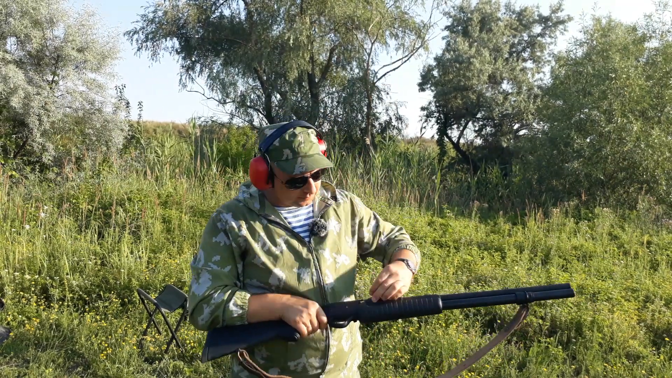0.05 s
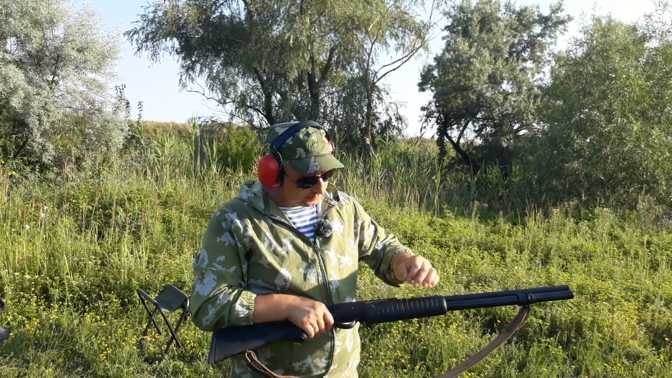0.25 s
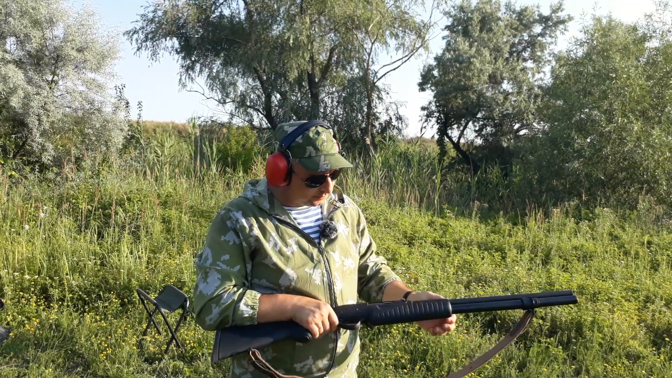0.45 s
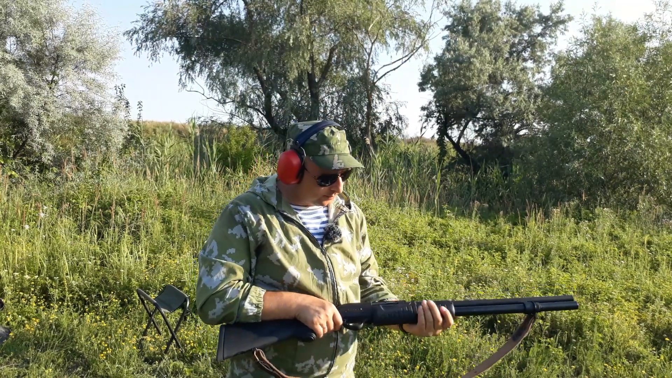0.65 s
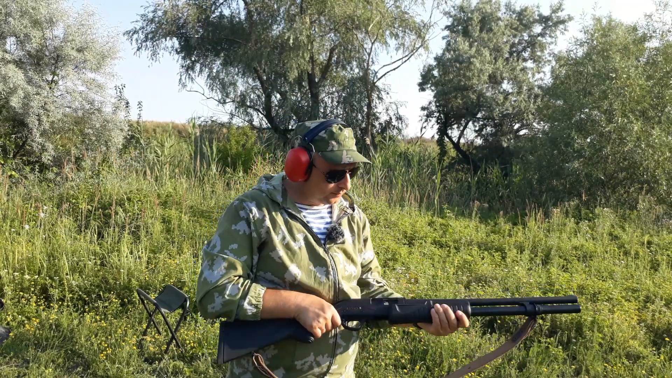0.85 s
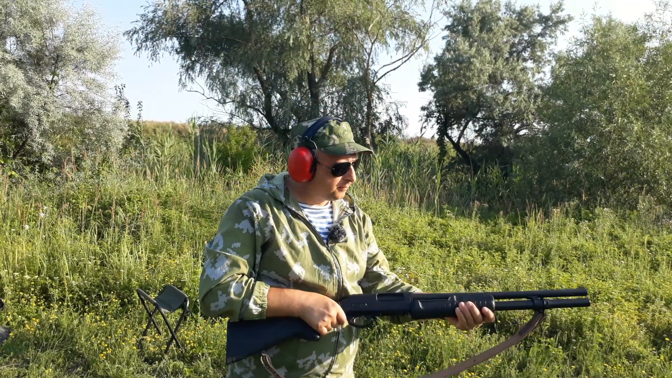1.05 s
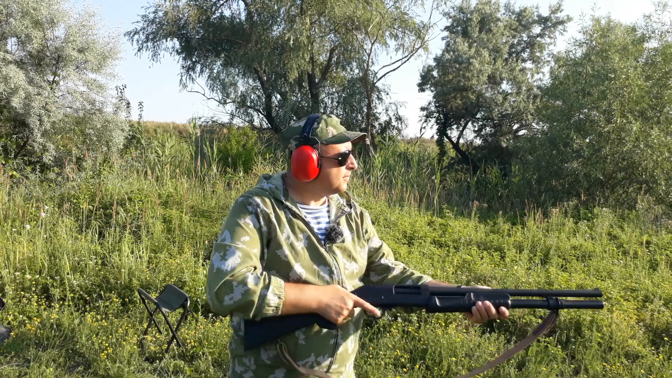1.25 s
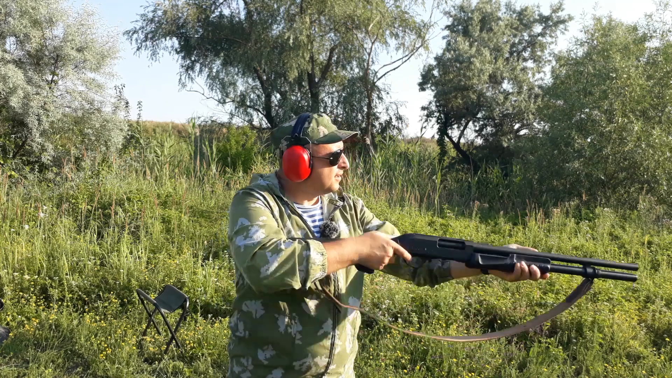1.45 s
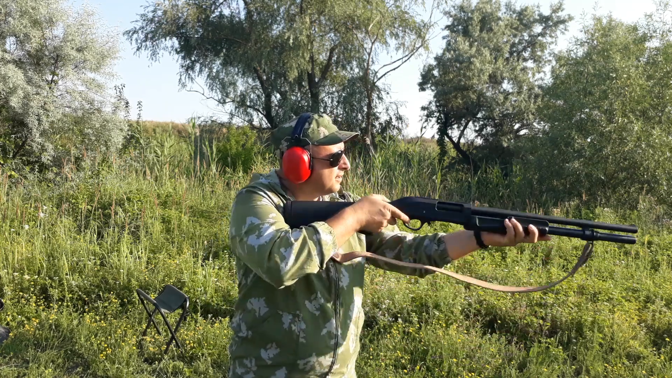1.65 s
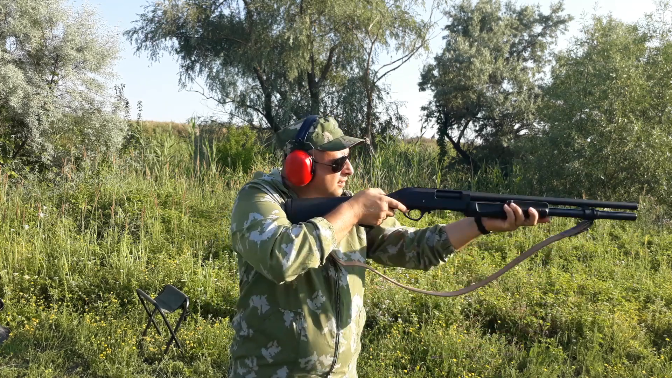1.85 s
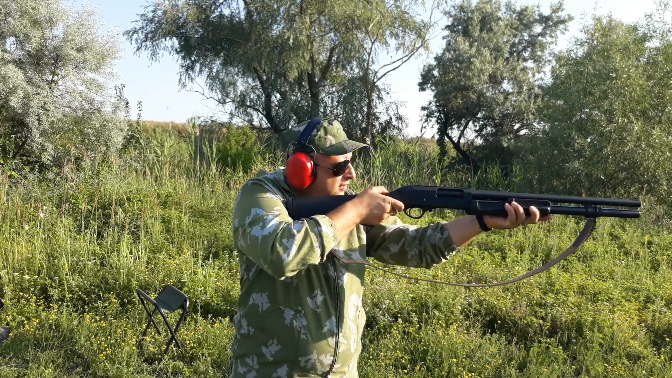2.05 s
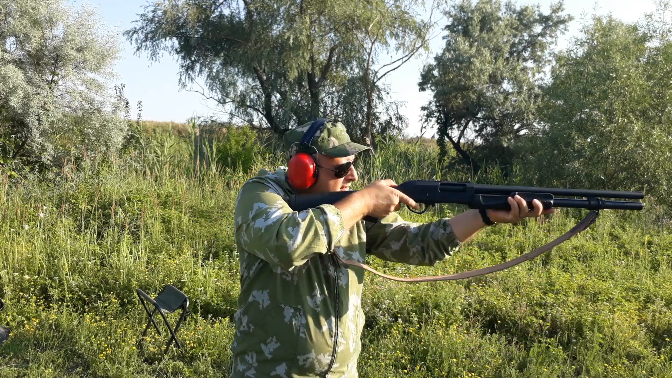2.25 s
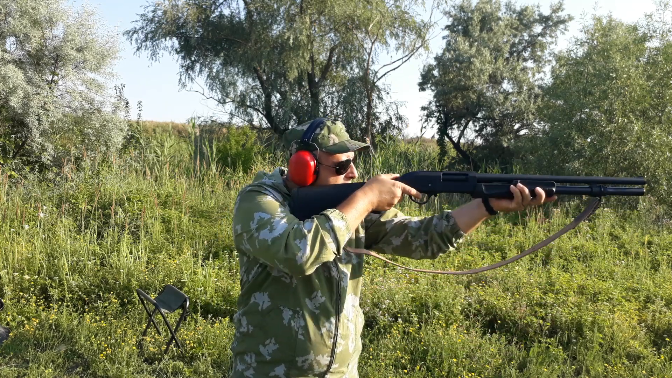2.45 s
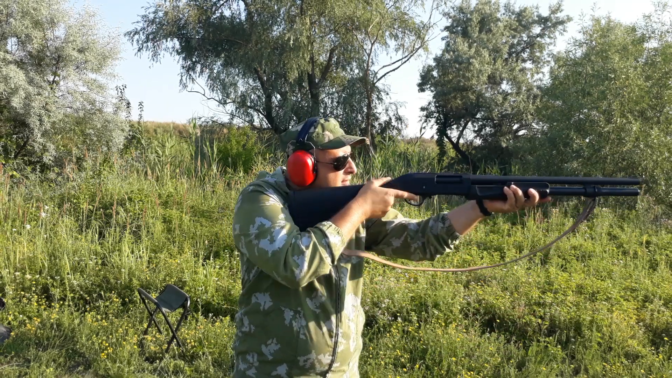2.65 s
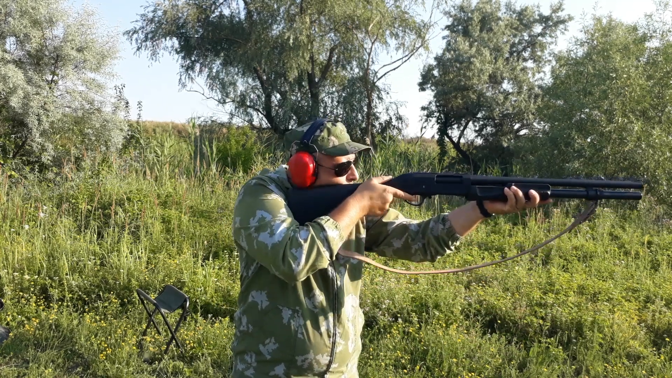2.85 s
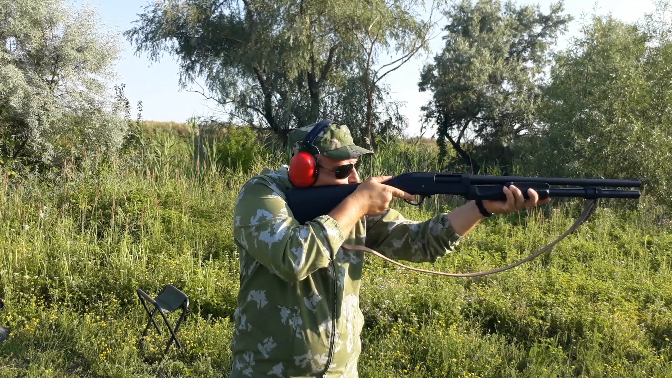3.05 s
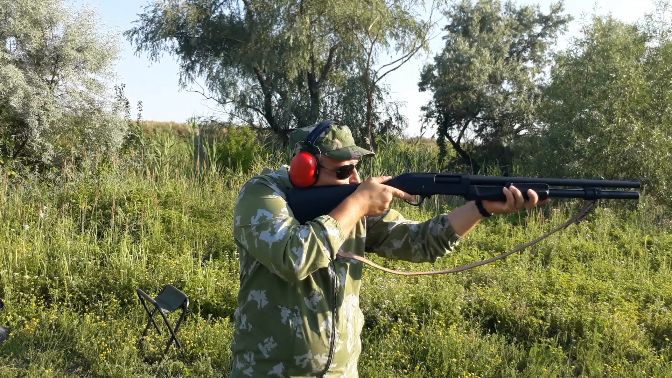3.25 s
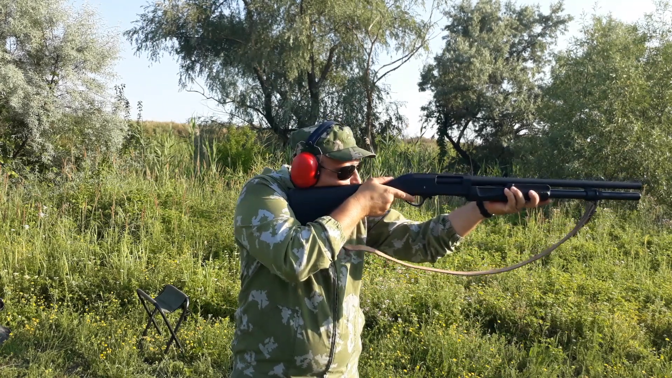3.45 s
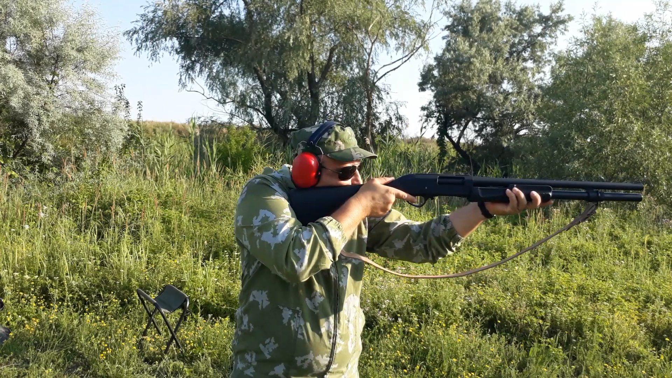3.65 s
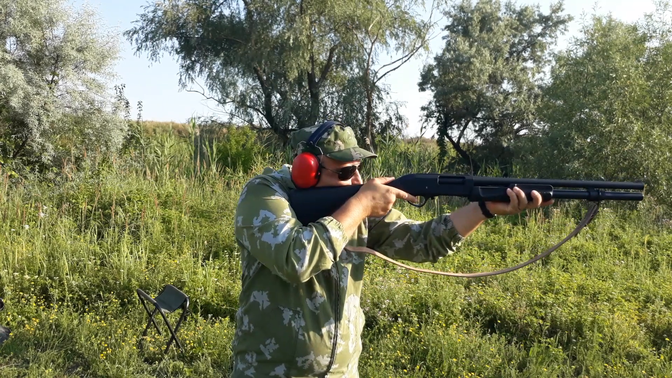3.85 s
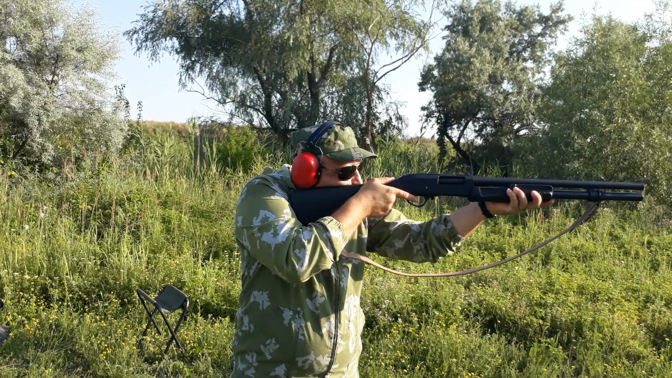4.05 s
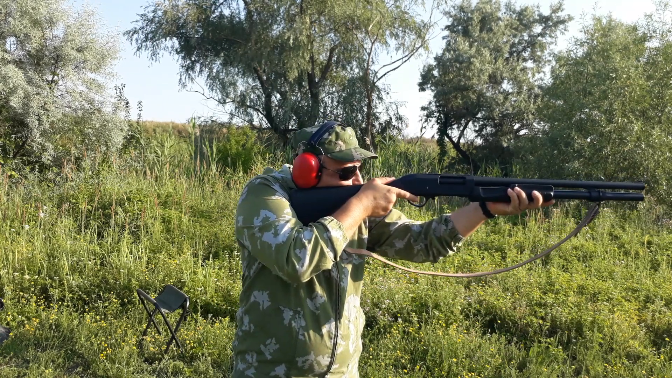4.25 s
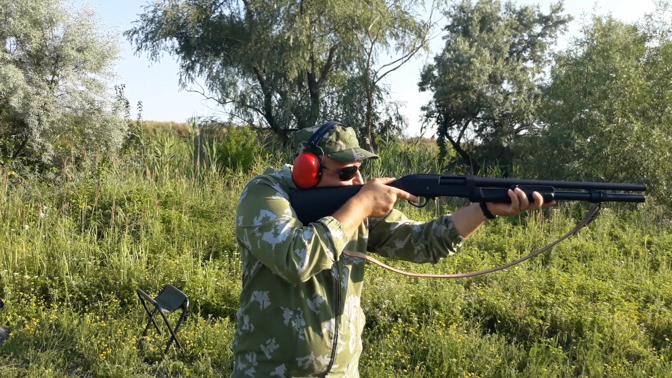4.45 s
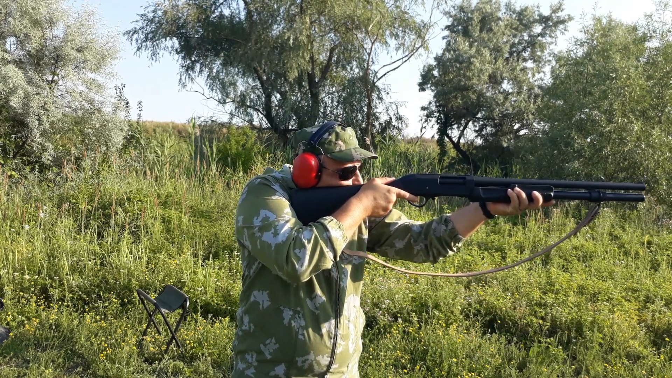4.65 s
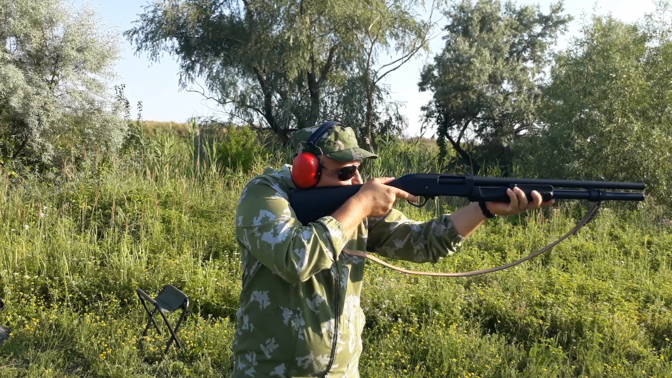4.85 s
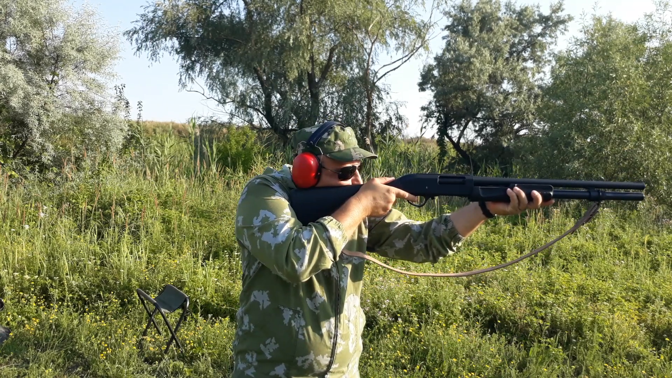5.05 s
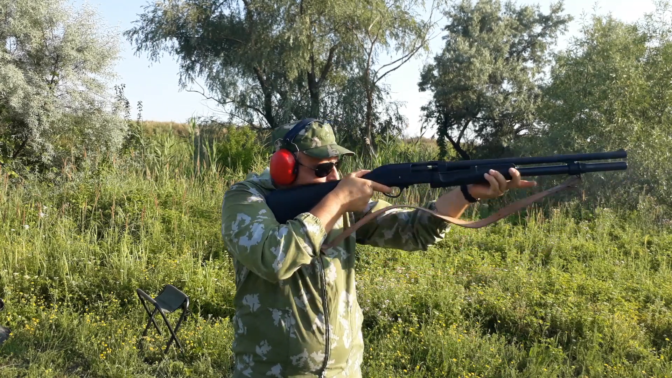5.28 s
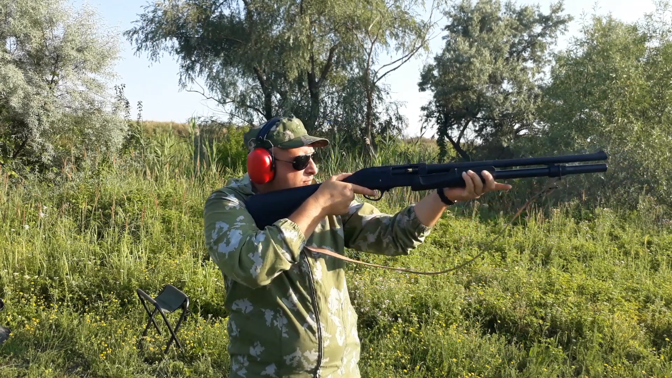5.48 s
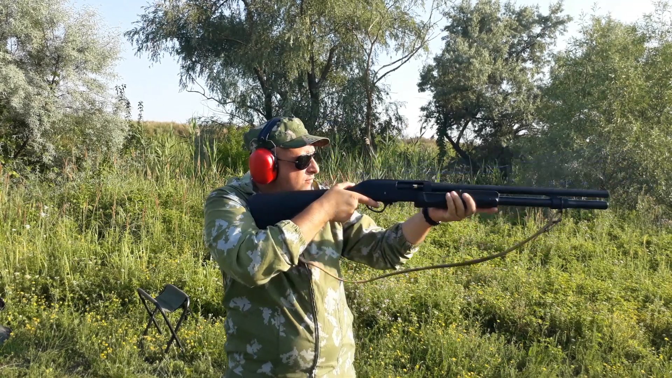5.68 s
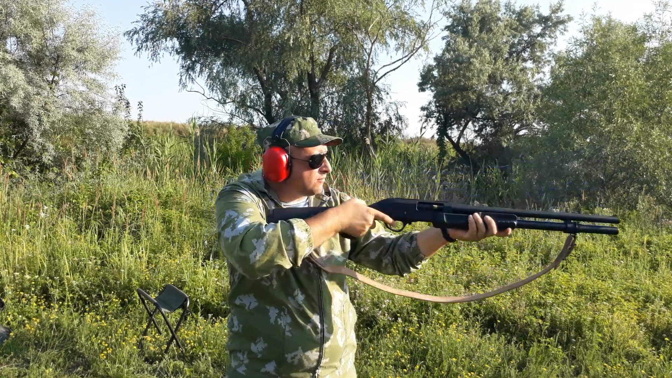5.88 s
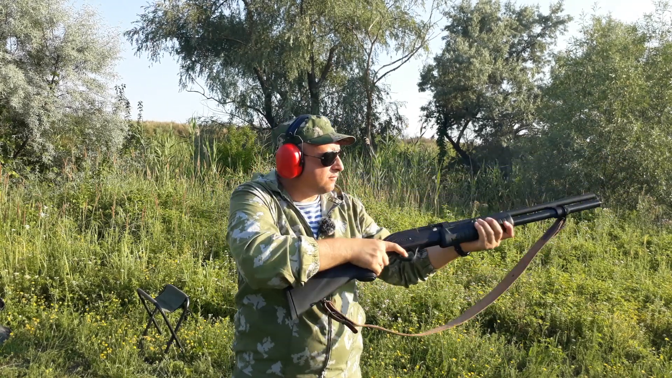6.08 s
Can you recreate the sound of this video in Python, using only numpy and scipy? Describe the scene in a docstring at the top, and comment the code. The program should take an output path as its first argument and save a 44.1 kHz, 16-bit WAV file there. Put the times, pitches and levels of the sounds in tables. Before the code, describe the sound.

A pump-action shotgun is loaded and racked shut, clothing rustles and bumps the microphone, then one loud shot echoes across a field.

```python
"""A meadow, heard through a small microphone clipped to the jacket of someone with a pump-action shotgun.
A shell is thumbed in and the slide is racked shut: steel scrapes and clicks, and a spring twangs.
The jacket rustles, and the stock (the gun's shoulder end) bumps the microphone on its way up.
One shot overloads the microphone's input, rolls over the field and comes back from the trees.
Faint air noise and an electric hum lie under it all."""
import sys
import numpy as np
from scipy import signal
from scipy.io import wavfile

SR = 44100
rng = np.random.default_rng(int(sys.argv[2]) if len(sys.argv) > 2 else 0)


def pcm_store(signal):
    """Save signal as 16-bit PCM."""
    levels = np.round(np.clip(np.atleast_2d(signal), -1, 1) * 32767)
    wavfile.write(sys.argv[1], SR, levels.astype(np.int16).T)


N = 269892
TIME = np.arange(N) / SR
SHOT_S = 5.363

# tone of things rubbing, cloth or steel: f/Hz, level/dB
FRICTION_SPECTRUM = [(50, -27), (100, -8.5), (250, -5), (600, -4), (1200, -3), (2000, 0.5), (3000, -11),
                     (5000, -17), (6000, -23), (10000, -28)]
# tone of a sharp snap: f/Hz, level/dB
SNAP_SPECTRUM = [(2400, -31.5), (3300, 3.5), (4000, -0.5), (5000, 3), (5700, -6), (7000, -7.5),
                 (8700, -13.5), (9600, -9.5), (11000, -28.5)]


def from_db(db):
    """Turn decibels into a number to multiply a sound by."""
    return 10 ** (np.asarray(db) / 20)


def rms_one(x):
    """Scale a sound so that its average strength (rms) is 1."""
    return x / np.sqrt(np.mean(x ** 2) + 1e-20)


def add(out, s, sound):
    """Mix a sound in, starting at s seconds."""
    start = round(s * SR)
    out[start:start + len(sound)] += sound[:N - start]


def coloured(x, points):
    """Shape the tone of a noise with rows of f/Hz, level/dB; the result has rms 1."""
    hz, db = np.transpose(points)
    bins = np.maximum(np.fft.rfftfreq(len(x), 1 / SR), 1)
    gain = from_db(np.interp(np.log(bins), np.log(hz), db))
    return rms_one(np.fft.irfft(np.fft.rfft(x) * gain, len(x)))


def keep_side(x, hz, kind, order=2):
    """Keep the "low" or the "high" side of a sound, split at hz."""
    return signal.sosfilt(signal.butter(order, hz, kind, fs=SR, output="sos"), x)


def resonance(x, hz, width_hz):
    """Make a sound ring at one pitch; a narrower width rings longer."""
    r = np.exp(-np.pi * width_hz / SR)
    feedback = [1, -2 * r * np.cos(2 * np.pi * hz / SR), r * r]
    return signal.lfilter(np.array([1, 0, -1]) * (1 - r * r) / 2, feedback, x + 1e-18)


def dying(t, t60):
    """A fade that starts at t = 0 and drops 60 dB every t60 seconds; silence before."""
    return np.exp(-np.log(1000) * np.maximum(t, 0) / t60) * (t >= 0)


def grains(spread_db):
    """Rubbing noise: tiny slips of uneven size, a new size every millisecond."""
    marks = np.arange(0, N, SR // 1000)
    sizes = np.clip(rng.standard_normal(len(marks)), -2, 2)
    return rng.standard_normal(N) * from_db(spread_db * np.interp(np.arange(N), marks, sizes))


def snagging(per_s, db, t60):
    """A loudness curve that jumps at each random snag and falls back."""
    snags = (rng.random(N) < per_s / SR) * rng.uniform(.5, 1, N)
    jumps = signal.lfilter([1], [1, -1000 ** (-1 / (t60 * SR))], snags + 1e-18)
    return rms_one(1 + from_db(db) * jumps)


def gains(rows, fade_s=0.043):
    """One loudness curve for each dB column of timed rows, fading out beyond their ends."""
    s, *columns = np.transpose(rows)
    outside = np.maximum(np.maximum(s[0] - TIME, TIME - s[-1]), 0)
    return np.array([from_db(np.interp(TIME, s, db)) for db in columns]) * np.exp(-outside / fade_s)


def air_and_hum(air_db=-61.5):
    """Still air, amplifier hiss and a thin electric hum."""
    # the tones of the hum: f/Hz, rms level/dB
    hum_tones = [(249.6, -67), (500, -75), (749.7, -69), (1071, -77), (1250, -77), (1427, -79)]
    # tone of the air and hiss: f/Hz, level/dB
    air_spectrum = [(25, -26.5), (60, -13), (120, -14.5), (250, -14.5), (500, -11), (800, -18), (1300, -20),
                    (2400, -24), (4500, -31), (8000, -35), (11000, -38), (15500, -38)]
    hum = sum(np.sqrt(2) * from_db(db) * np.sin(2 * np.pi * (hz * TIME + rng.random()))
              for hz, db in hum_tones)
    return hum + from_db(air_db) * coloured(rng.standard_normal(N), air_spectrum)


def jacket(housing_hz=600, width_hz=470, sway_hz=240):
    """Cloth rubs the microphone's case, sleeves and sling rustle and snag, the swaying jacket rumbles."""
    # raising and shouldering the gun, a list for each: t/s, then relative rub/dB, rustle/dB, sway/dB
    moves = [
        [(1.65, -61, -64, -69), (1.686, -55, -66.5, -59.5), (1.716, -77.5, -82, -70.5), (1.75, -68, -61, -77),
         (1.784, -54, -68, -63), (1.8, -43, -55, -62), (1.908, -73, -59.5, -51.5), (1.95, -58, -63.5, -65)],
        [(2.09, -55.5, -66, -55.5), (2.152, -53, -63, -49), (2.232, -63, -69, -65.5), (2.288, -57.5, -65, -63),
         (2.43, -48.5, -70.5, -56.5), (2.45, -60.5, -73, -66.5), (2.534, -38.5, -66, -66.5),
         (2.54, -37, -61, -58)],
    ]
    # small stirs between movements: t/s, length/s, relative level/dB
    stirs = [(0.719, .4, -60), (1.253, 0.12, -67.5), (2.89, 0.22, -62.5), (3.678, 0.14, -70.5)]
    # the gun's kick drags the jacket over the microphone: t/s, relative level/dB
    recoil = [(5.53, -18), (5.612, -30), (5.676, -39), (5.682, -33), (5.754, -41.5), (5.856, -32),
              (5.924, -48.5), (6.012, -40), (6.12, -47)]
    rub = resonance(grains(spread_db=5), housing_hz, width_hz)
    rub = rms_one(resonance(rub, housing_hz, width_hz))
    rustle = coloured(grains(spread_db=3.5), FRICTION_SPECTRUM) * snagging(per_s=30, db=10, t60=0.011)
    sway = rms_one(keep_side(grains(spread_db=2), sway_hz, "low"))
    rubbing, rustling, swaying = sum(gains(rows) for rows in moves)
    moving = from_db(-2.5) * rubbing * rub + from_db(1) * rustling * rustle
    moving += from_db(2.5) * swaying * sway
    stir = sum(from_db(db) * np.exp(-(2 * (TIME - s) / length) ** 2) for s, length, db in stirs)
    stirring = stir * (from_db(-1.5) * rub + from_db(-3) * rustle + from_db(-0.5) * sway)
    dragging = from_db(-2) * gains(recoil)[0] * rub
    return moving + stirring + dragging


def thuds(rise_s=.003, t60=0.017):
    """Hands and stock land softly: a low tone swells and dies within a few swings."""
    # soft landings: t/s, peak level/dB, f/Hz
    landings = [(0.335, -34, 193), (0.385, -40, 172), (0.467, -29, 208), (0.723, -38.5, 155),
                (.924, -33, 182), (1.033, -41, 173), (1.135, -29, 192), (1.181, -41.5, 178),
                (1.626, -42.5, 161), (2.045, -36, 270), (2.134, -36, 174), (2.565, -29, 137.2),
                (2.733, -42, 100)]
    out, t = np.zeros(N), TIME[:SR // 5]
    for s, db, hz in landings:
        thud = np.sin(2 * np.pi * hz * t) * (1 - np.exp(-t / rise_s)) * dying(t, t60)
        add(out, s, from_db(db) * thud / np.abs(thud).max())
    return out


def dull_knocks(settle_db=-37, settle_t60=0.089, thin_hz=280):
    """Dull knocks at the microphone: each rings briefly, then a faint noise settles."""
    # bumps, and the hammer falling just before the shot: t/s, peak level/dB, f/Hz, muffled above/Hz
    knocks = [(2.5662, -2, 565, 2600), (2.5716, -8, 588, 900), (2.611, -21, 500, 900),
              (2.6584, -27.5, 490, 1200), (2.729, -42, 590, 1200), (2.9675, -4, 566, 1150),
              (4.793, -45.5, 589.6, 1200), (5.248, -37.5, 636, 1200), (5.33, -37, 627, 1200),
              (5.359, -14.5, 744, 1780), (5.517, -5.5, 833, 1990), (5.535, -6, 753, 1500),
              (5.559, -14.5, 550, 1500), (5.632, -18.5, 746, 1500), (5.643, -15.5, 685, 1500),
              (5.6688, -14, 548, 1500), (5.699, -23.5, 630, 1200), (5.824, -27, 575, 1200),
              (5.8485, -25, 584, 1200)]
    out, t = np.zeros(N), TIME[:SR // 5]
    for s, db, hz, muffled_hz in knocks:
        force = (t == 0) + from_db(settle_db) * rng.standard_normal(len(t)) * dying(t, settle_t60)
        force = keep_side(keep_side(force, muffled_hz, "low"), thin_hz, "high")
        knock = resonance(resonance(force, hz, width_hz=220), hz, width_hz=290)
        add(out, s, from_db(db) * knock / np.abs(knock).max())
    return out


def magazine_spring(rasp_db=-8, rasp_t60=0.2):
    """The spring that pushes the shells twangs when jolted and rasps against its tube."""
    # jolts to the spring: t/s, relative level/dB
    twangs = [(.167, -27.5), (0.317, -40), (.387, -43.5), (.547, -46.5), (.839, -49.5), (1.122, -39)]
    # the spring's own tones: f/Hz, relative level/dB, t60/s
    tones = [(390, -16.5, 0.19), (450, -7, 0.3), (565, -1, 0.26), (724, -3, .2), (916, -3, 0.22),
             (960, -2.5, .18), (1020, -1, 0.26), (1140, 2.5, 0.24), (1260, -1.5, .18), (1760, -9.5, .12),
             (2280, -2, .12)]
    # tone of the rasp: f/Hz, level/dB
    rasp_spectrum = [(1000, -16.5), (1600, -5), (2300, 0.5), (3000, -8.5), (3800, -9), (4500, -29),
                     (9000, -44)]
    out, t = np.zeros(N), TIME[:SR // 2]
    for s, db in twangs:
        ring = sum(from_db(level) * rng.choice([-1, 1]) * np.sin(2 * np.pi * hz * t) * dying(t, t60)
                   for hz, level, t60 in tones)
        rasp = coloured(rng.standard_normal(len(t)), rasp_spectrum)
        add(out, s, from_db(db) * (ring / 2 + from_db(rasp_db) * rasp * dying(t, rasp_t60)))
    return out


def receiver_pitch(s, rest_hz=2027, bolt_hz=2380, sink_hz_per_s=9000, start_s=1.005, shut_s=1.092):
    """Main pitch of the receiver, the gun's steel body: it starts high and sinks as the bolt slides."""
    travelling = (s >= start_s) & (s < shut_s)
    return np.where(travelling, bolt_hz - sink_hz_per_s * (s - start_s), rest_hz)


def sliding_steel(scrape_db=-4, ring_db=-3, snap_db=-14, ease_db=3.5, rise_s=0.0062):
    """Steel scrapes and catches on steel and keeps the receiver ringing; each stroke eases a little."""
    # the shell slides in, then the bolt slides shut: start/s, end/s, relative level at the end/dB
    strokes = [(0.304, 0.363, -49.5), (0.509, 0.573, -42), (1.016, 1.125, -23)]
    push = 0
    for start, end, db in strokes:
        to_go = np.clip((end - TIME) / (end - start), 0, 1)
        held = np.clip((TIME - start) / rise_s, 0, 1) * dying(np.maximum(TIME - end, 0), t60=.07)
        push = push + from_db(db + ease_db * to_go) * held
    catches = snagging(per_s=64, db=5.5, t60=0.024)
    # slow noise roughens the ring into a narrow band around its pitch
    phase = 2 * np.pi * np.cumsum(receiver_pitch(TIME)) / SR
    wobble_a, wobble_b = keep_side(rng.standard_normal((2, N)), 230, "low")
    ring = rms_one(wobble_a * np.cos(phase) + wobble_b * np.sin(phase))
    scrape = coloured(grains(spread_db=1), FRICTION_SPECTRUM)
    snap = coloured(rng.standard_normal(N), SNAP_SPECTRUM)
    steel = from_db(scrape_db) * scrape + from_db(ring_db) * ring + from_db(snap_db) * snap
    return push * catches * steel


def struck(force, tones, scatter_db, detune=0.014):
    """Each blow lands somewhere else, so a part's tones vary in strength and pitch."""
    chance = np.clip(rng.standard_normal((len(tones), 2)), -2, 2)
    out = 0
    for (hz, width, db), (louder, higher) in zip(tones, chance):
        ring = resonance(force, hz * (1 + detune * higher), width)
        out = out + from_db(db + scatter_db * louder) * rms_one(ring)
    return out


def clicks_and_ticks(click_db=12, chatter_db=-24, focus_db_per_octave=22, min_width_hz=130):
    """Clicks of metal parts and a few faint sleeve ticks: each a click, a rough push and faint chatter."""
    # clicks and ticks: t/s, stock knock/dB, receiver ring/dB, relative snap level/dB
    contacts = [(0.167, -20, -24, -45), (0.237, -34, -30, -40), (0.266, -48, -42, -57),
                (0.285, -42, -47, -62), (0.294, -36, -36, -38.5), (0.3165, -64, -27, -33.5),
                (0.386, -26.5, -37, -37), (0.448, -36, -48, -52), (0.465, -32.5, -38, -52),
                (0.4785, -41, -33, -36), (0.488, -35, -35, -41), (0.498, -39, -36, -43),
                (0.525, -44, -31, -44), (0.536, -32.5, -33, -45), (0.547, -28, -20.5, -31.5),
                (0.554, -42, -26.5, -38), (0.569, -43, -34.5, -46), (0.838, -30.5, -42, -52.5),
                (0.923, -41.5, -43, -77), (0.957, -42.5, -52, -70), (1.006, -27, -19.5, -39),
                (1.02, -33.5, -13.5, -38.5), (1.024, -24, -19, -21.5), (1.037, -25.5, -16, -46),
                (1.044, -21.5, -14, -24), (1.056, -24, -16.5, -20), (1.06, -28, -12.5, -33),
                (1.075, -17, -18.5, -22.5), (1.099, -21.5, -25, -24), (1.11, -29.5, -22, -29.5),
                (1.117, -17.5, -9.5, -20), (1.122, -9.5, -11, -19.5), (1.125, -18.5, -19, -25),
                (1.934, -51, -66, -77), (1.97, -42.5, -51, -61.5), (2.047, -26.5, -31, -44),
                (2.133, -49, -52.5, -75.5), (2.303, -50, -68, -62.5), (5.824, -43, -39.5, -55)]
    # tones of the stock: f/Hz, width/Hz, level/dB
    stock_tones = [(332, 57, -13.5), (523, 70, -6.5), (655, 110, -1.5), (900, 120, -1.5), (990, 120, 0.5),
                   (1200, 100, -1.5)]
    # tones of the receiver: f/Hz, width/Hz, level/dB
    receiver_tones = [(1581.4, 150, 0), (1750, 180, 3.5), (2110, 280, -2), (2000, 33, -6),
                      (2500, 100, -21.5), (2880, 170, -2), (3205, 300, -2)]
    out, t = np.zeros(N), TIME[:4096]
    level_samples = SR // 200  # a contact's level is its energy spread over 5 ms
    for s, knock_db, ring_db, snap_db in contacts:
        chatter = from_db(chatter_db) * dying(t, t60=.04)
        rough_push = rng.standard_normal(len(t)) * (dying(t, t60=0.012) + chatter)
        force = from_db(click_db) * (t == 0) + rough_push
        snap = coloured(rng.standard_normal(len(t)), SNAP_SPECTRUM) * (dying(t, t60=0.01) + chatter)
        # a blunt contact, all knock and little snap, also lacks the highest treble
        snap = keep_side(snap, 9000 * from_db(0.41 * min(snap_db - knock_db, 0)), "low")
        stock = struck(force, stock_tones, scatter_db=2)
        stock = keep_side(keep_side(stock, 1700, "low"), 260, "high")
        # the receiver's tones die quickly, and those far from the main pitch are weaker
        main_hz = receiver_pitch(s)
        tones = [(hz, max(width, min_width_hz), db - focus_db_per_octave * abs(np.log2(hz / main_hz)))
                 for hz, width, db in receiver_tones]
        receiver = struck(force, tones, scatter_db=9.5)
        receiver = keep_side(keep_side(receiver, 1100, "high"), 2600, "low", order=4)
        for part, db in (stock, knock_db), (receiver, ring_db), (snap, snap_db + 1):
            add(out, s, from_db(db) * part / np.sqrt(np.sum(part ** 2) / level_samples))
    return out


def echoes():
    """The blast comes back from the ground, a bank and the trees as lumpy bursts of noise."""
    # each echo: t/s, level/dB, rise/s, t60/s, thin below/Hz, dull above/Hz
    returns = [(5.407, -12.5, 0.0073, 0.43, 39, 7200), (5.42, -21.5, 0.011, .2, 40, 217),
               (5.513, -12.5, 0.0047, 0.092, 900, 5600), (5.525, -20.5, 0.0072, 0.083, 40, 395),
               (5.615, -34, 0.026, 0.21, 605, 5050), (5.80, -40.5, 0.014, 0.31, 59.5, 1990),
               (5.98, -46, 0.0062, 0.71, 62.8, 1170)]
    # tone that all echoes start from: f/Hz, level/dB
    echo_spectrum = [(30, -22), (70, -4), (120, 0.5), (210, -4), (380, 1.5), (600, 3), (1100, -4.5),
                     (2500, -11.5), (5000, -19.5), (7500, -28.5), (10000, -33.5)]
    out, t = np.zeros(N), TIME[:SR]
    for s, db, rise_s, t60, thin_hz, dull_hz in returns:
        scatter = coloured(grains(spread_db=3)[:SR], echo_spectrum)
        scatter = keep_side(scatter, thin_hz, "high", order=1)
        scatter = rms_one(keep_side(scatter, dull_hz, "low", order=1))
        shape = np.clip(t / rise_s, 0, 1) * dying(np.maximum(t - rise_s, 0), t60)
        add(out, s, from_db(db) * scatter * shape)
    return out


def boom(start_s=5.418, db=-18.5, hz=112, rise_s=.012, t60=.17):
    """The heaviest part of the blast returns from the ground as a short, low tone."""
    age = np.maximum(TIME - start_s, 0)
    return from_db(db) * np.sin(2 * np.pi * hz * age) * np.minimum(age / rise_s, 1) * dying(age, t60)


def shot(blast_db=-4, rise_s=0.0034, fade_from_s=0.0059, blast_t60=0.28, crack_db=-8, crack_t60=0.02):
    """A bright crack leaves the muzzle, with the heavy blast under it."""
    # tone of the blast before its treble is softened: f/Hz, level/dB
    blast_spectrum = [(30, -34.5), (100, -11), (220, -3), (380, 2), (600, -3), (1300, -9), (3000, -14),
                      (6000, -20), (10000, -25)]
    age = TIME - SHOT_S
    shape = np.clip(age / rise_s, 0, 1) * dying(np.maximum(age - fade_from_s, 0), blast_t60)
    blast = coloured(rng.standard_normal(N), blast_spectrum)
    blast = rms_one(keep_side(blast, 2200, "low", order=1))
    crack = keep_side(rng.standard_normal(N), 910, "high")
    crack = rms_one(keep_side(crack, 1500, "low", order=1))
    return from_db(blast_db) * blast * shape + from_db(crack_db) * crack * dying(age, crack_t60)


def scene():
    """Loading, handling and firing the gun, mixed into one channel."""
    loading = clicks_and_ticks() + sliding_steel() + magazine_spring()
    handling = thuds() + dull_knocks() + jacket()
    return (loading + handling + shot() + echoes() + boom())[None]


def overload(dry, ceiling, rise_s=0.0239, overshoot_s=0.0091, recover_s=0.11):
    """The input chops off peaks. At the shot it is thrown off centre and briefly passes only spikes."""
    age = np.maximum(TIME - SHOT_S, 0)
    thrown = np.minimum(age / rise_s, 1) ** 2
    since_peak = np.maximum(age - rise_s, 0)
    overshoot = 0.75 * thrown ** 4 * np.exp(-since_peak / overshoot_s)
    offset = 1.09 * thrown * np.exp(-since_peak / recover_s) + overshoot  # 1 is the input's full swing
    return ceiling * (np.clip(dry / ceiling + offset, -1, 1) - np.clip(offset, -1, 1))


def record(dry, ceiling=0.76, coupling_hz=75, rumble_hz=60, microphone_top_hz=9950, top_hz=15760):
    """The input overloads, the deepest bass and highest treble are lost, and air and hum join in."""
    thinned = keep_side(overload(dry, ceiling), coupling_hz, "high")
    thinned = keep_side(thinned, rumble_hz, "high")
    limited = np.clip(thinned, -ceiling, ceiling)
    microphone_filter = signal.ellip(10, .3, 80, microphone_top_hz, fs=SR, output="sos")
    final_filter = signal.ellip(10, .3, 70, top_hz, fs=SR, output="sos")
    return signal.sosfilt(final_filter, signal.sosfilt(microphone_filter, limited) + air_and_hum())


dry = scene()
out = record(dry)
pcm_store(out)
```